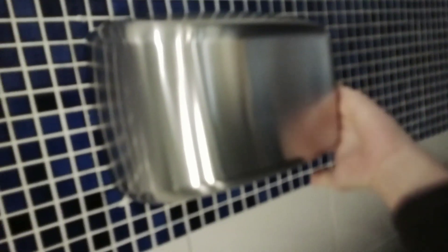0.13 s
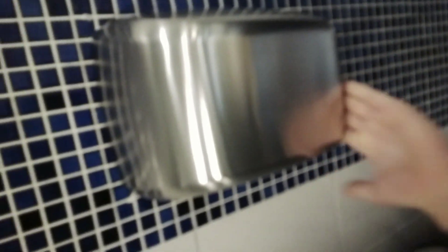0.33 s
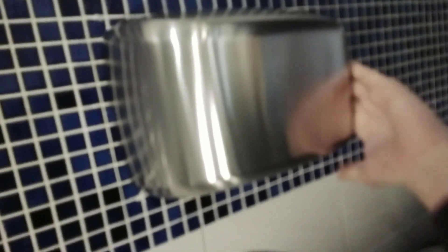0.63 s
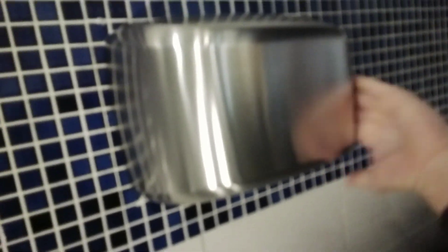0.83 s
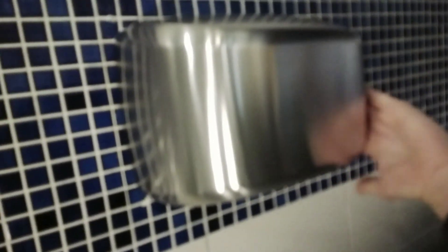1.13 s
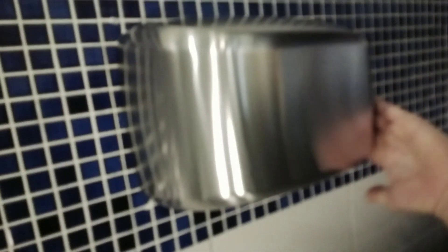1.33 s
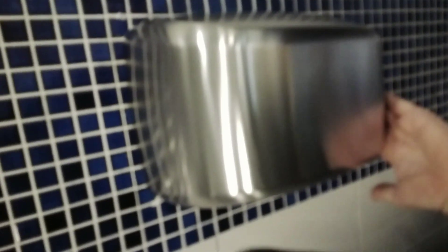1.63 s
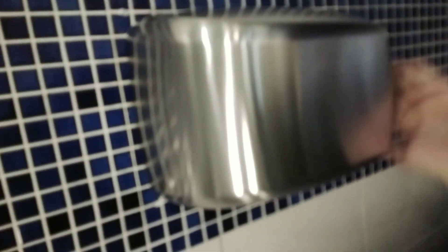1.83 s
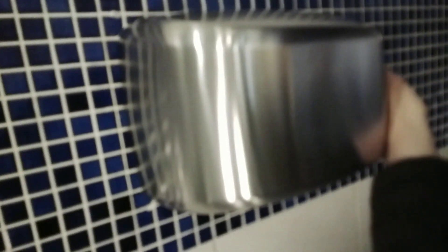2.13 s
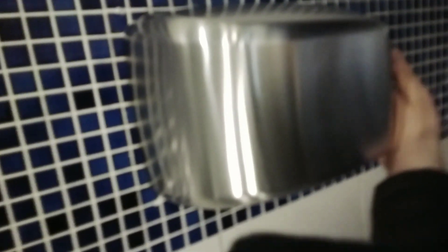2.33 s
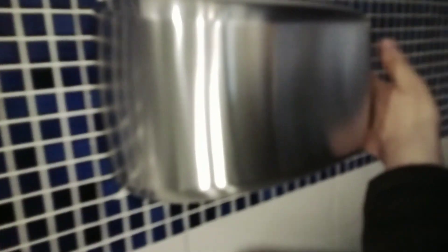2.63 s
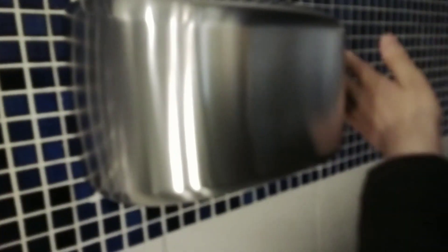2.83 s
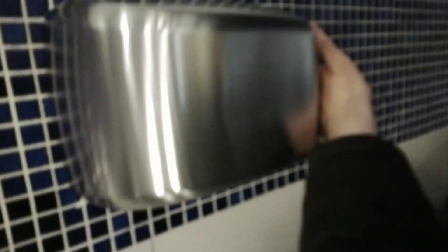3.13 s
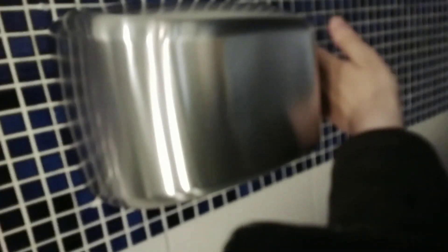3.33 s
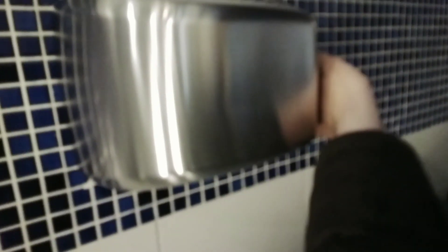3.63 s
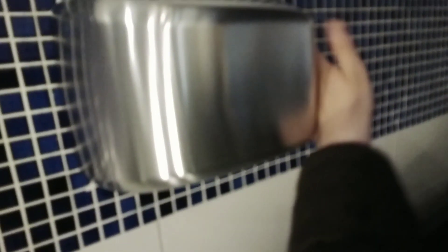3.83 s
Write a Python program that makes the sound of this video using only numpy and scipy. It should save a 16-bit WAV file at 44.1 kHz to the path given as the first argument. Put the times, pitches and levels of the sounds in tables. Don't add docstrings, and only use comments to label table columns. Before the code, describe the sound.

Close up in a tiled washroom, a hand dryer's soft airflow swells unevenly over a waving hand, dies away, then a small relay click starts a much louder broadband rush with a rising motor tone.

```python
import sys
import numpy as np
from scipy import signal
from scipy.fft import rfft, irfft
from scipy.io import wavfile
from scipy.ndimage import uniform_filter1d

SR = 44100
rng = np.random.default_rng(int(sys.argv[2]) if len(sys.argv) > 2 else 0)


def natural_amplitude(level_db):
    exponent = np.asarray(level_db, float) / 20
    return 10 ** exponent


def int16_out(signal):
    q = np.round(np.clip(np.atleast_2d(signal).T, -1, 1) * 32767)
    wavfile.write(sys.argv[1], SR, q.astype(np.int16))


N = 176400
T = np.arange(N) / SR

# frequency in Hz, spectrum level in dB per Hz.
FLOOR_SPECTRUM = [(30, -38), (138, 0), (420, -23.5), (740, -9), (2600, -23), (8300, -21.5), (16000, -50)]
# middle in seconds, lowest Hz, highest Hz, level in dB.
STEREO_FLECKS = [(.29, 8200, 9700, -49), (.29, 14500, 15700, -57), (.383, 5100, 6400, -59),
                 (.383, 8900, 10400, -58), (1.684, 6200, 8300, -48), (1.684, 8900, 10400, -52),
                 (2.36, 11000, 12500, -75), (2.427, 4200, 7000, -66), (2.475, 8900, 13100, -72),
                 (3.309, 6900, 8400, -37), (3.309, 12300, 13800, -45)]
# frequency in Hz, width in Hz, level in dB.
RELAY_MODES = [(800, 300, -17), (4500, 810, -23), (6480, 480, -2), (8000, 540, 5), (9300, 1200, 5),
               (12200, 900, 2), (14500, 2100, -5)]
# start in seconds, level in dB, pitch in Hz, ring T60 in seconds.
BUMPS = [(0.0011, -26.5, 248.7, 0.15), (0.64, -28, 237, 0.047), (0.67, -32.5, 284, 0.13),
         (0.841, -26, 211, 0.098), (.875, -29, 277, 0.12), (1.115, -35, 280, 0.056),
         (1.256, -26.5, 293, 0.12), (1.325, -24.5, 254, 0.051), (1.394, -29, 270, 0.053),
         (1.501, -31, 285, 0.21), (1.53, -36.5, 144, 0.29), (0.129, -43.5, 137, 0.48),
         (2.42, -49.5, 64, 0.36), (1.92, -40.5, 298, 0.54), (.02, -47, 57, .2), (1.525, -38, 205, .08),
         (.18, -40, 255, .1), (.008, -31, 205, .13), (1.56, -36, 312, 0.12), (.635, -47, 55, .1),
         (0.83, -48, 55, 0.16), (1.05, -48, 52, 0.1), (1.437, -49, 60, .08), (2.8654, -28, 285, 0.15),
         (3.05, -23.5, 270, 0.079), (3.28, -26.5, 269, .1), (3.61, -17, 285, 0.12), (3.831, -20, 285, 0.24)]
# start in seconds, length in seconds, level in dB, pitch in Hz.
WHISTLES = [(2.87, .15, -35, 2630), (2.76, .09, -36, 900), (3.0, .2, -37, 2700), (2.99, .11, -34, 295),
            (.96, .09, -50, 15550), (1.17, .09, -49, 15550), (1.57, .06, -54, 15550), (1.84, .15, -46, 700),
            (2.75, .09, -43, 2000), (2.77, .1, -45, 2620), (3.05, .13, -34, 1950), (2.91, .04, -36, 900),
            (1.5, .15, -45, 2050), (.5, .1, -45, 2050), (.27, .08, -44, 1900), (1.15, .06, -46, 2950),
            (.53, .07, -46, 5700), (.75, .07, -47, 5700), (1.38, .06, -52, 5800), (1.24, .08, -44, 680),
            (1.5, .07, -44, 700), (2.49, .07, -59, 1450), (1.85, .05, -46, 1000), (1.91, .08, -45, 620),
            (.8, .13, -46, 600), (2.72, .08, -50, 8300), (2.78, .08, -44, 60), (3.9, .1, -34, 690)]
# frequency in Hz, spectrum level in dB per Hz.
PALM_SPECTRUM = [(530, -35), (900, 3.5), (1120, -10.5), (2040, -4), (3330, -5), (4400, -9.5), (8410, -6),
                 (14400, -22), (15900, -28)]
# middle in seconds, length in seconds, level in dB, gap whistle in Hz, hiss in dB.
SWEEPS = [(0.211, 0.077, -45, 3100, 6.5), (0.311, 0.085, -35, 1750, -4.5), (0.266, 0.086, -36, 3350, -3),
          (0.56, .14, -39, 1930, 1.2), (0.791, .13, -39.5, 1930, 0.7), (0.99, 0.12, -37.5, 1940, -1),
          (1.211, 0.11, -37, 2200, 1), (1.398, 0.087, -38, 1700, -0.5), (1.588, 0.12, -36, 3430, 0),
          (1.568, 0.026, -32, 3700, -0.5), (1.6, 0.057, -36, 1940, -3), (.765, 0.047, -36, 2030, -1),
          (.24, .05, -42.5, 3700, -3), (0.332, 0.05, -40, 3050, -4), (0.578, 0.091, -44, 3300, -5),
          (0.619, 0.044, -40, 1450, -4), (.83, .05, -42, 2400, -8), (1.04, 0.022, -37, 1500, -9),
          (1.02, .03, -41, 2600, -7), (1.18, .06, -41.5, 2500, -4), (1.255, .025, -34.5, 1800, -5),
          (1.427, 0.017, -36.5, 1400, -2), (3.07, 0.23, -36.5, 8300, 1), (3.9, 0.16, -37, 6400, 2.5),
          (1.703, 0.19, -42, 2740, -0.5), (2.48, 0.17, -54, 1650, -26), (1.934, 0.2, -47, 1700, 1.7),
          (2.798, 0.05, -35, 1700, -16), (3.09, 0.21, -30, 1840, 0.5), (3.426, 0.15, -31, 1500, 3),
          (3.648, 0.084, -25, 830, -2.5)]
# frequency in Hz, width in Hz.
NOZZLE_MODES = [(1500, 300), (2050, 92), (3210, 110), (5840, 130)]
# frequency in Hz, width in Hz, level over the jet in dB.
DUCT_MODES = [(137, 27, -16.5), (246.6, 17, -14), (285, 38, -11), (656, 85, -12), (554.8, 22, -19.5),
              (997.4, 18, -19.5), (1066, 14, -24.5), (1389, 30, -22), (1594, 58, -19.5), (1876, 42, -20.5),
              (2042, 65, -18.5), (2990, 810, -14), (3305, 61, -24.5), (7900, 2800, -10.5)]
# time in seconds, level in dB, treble tilt in dB.
RUNDOWN = [
    (0.0, -40, -1),
    (.43, -42.5, 3),
    (.68, -41.5, -2),
    (1.1, -40, 0.5),
    (1.47, -38.5, 1),
    (1.79, -39.5, 1.5),
    (2.13, -45.5, -0.5),
    (2.5, -58.5, 3.5),
    (2.7, -72, 1),
]
# time in seconds, level in dB, treble tilt in dB.
RESTART = [
    (2.74, -37.5, -4),
    (2.8, -27.5, -10.5),
    (2.84, -34, 0.5),
    (2.99, -24.5, 3),
    (3.15, -26.5, 5.5),
    (3.22, -24, -1.3),
    (3.6, -23, 0.5),
    (3.7, -21.5, .5),
    (4.0, -22, 0.3),
]
# frequency in Hz, spectrum level in dB per Hz.
WEAK_JET_SPECTRUM = [(18, -58), (30, -28), (90, -16), (280, -3.5), (394, -8.5), (632, -5), (3770, -19),
                     (8300, -15), (16000, -33)]
# time in seconds, level in dB.
HUM = [
    (2.7, -54),
    (2.746, -29),
    (2.86, -40.5),
    (2.95, -34.5),
    (4.0, -40),
]
# time in seconds, frequency in Hz, level in dB.
ROTOR = [
    (3.3, 132, -47),
    (3.59, 134.3, -53),
    (3.635, 137.7, -28),
    (3.76, 137.6, -23),
    (4.0, 143.3, -19),
]
# frequency in Hz, spectrum level in dB per Hz.
FULL_JET_SPECTRUM = [(30, -55), (90, -3.5), (280, 0.8), (700, -1.5), (2000, -9.5), (4400, -13.5),
                     (8300, -8), (16000, -26.5)]
# frequency in Hz, width in octaves, depth in dB, full at seconds.
LATE_BANDS = [(350, .8, -14, 2.87), (4600, .1, -11, 2.955), (6200, .3, -12, 2.79), (12500, .4, -9, 2.81),
              (1500, .5, -5, 2.95)]

RELAY_S = 2.7


def evened(x):
    return x / np.sqrt(np.mean(x ** 2) + 1e-20)


def read(points, hz):
    f, value = np.transpose(points)
    return np.interp(np.log(hz + 1), np.log(f + 1), value)


def resonate(x, hz, width):
    turn = np.exp(2j * np.pi * hz * np.arange(len(x)) / SR)
    r = np.exp(-np.pi * width / SR)
    return 2 * (turn * signal.lfilter([1 - r], [1, -r], x * turn.conj())).real


def resonate_twice(x, hz, width):
    return resonate(resonate(x, hz, width), hz, width)


def air(spectrum, field, patch_db):
    frames = N // 128 + 5
    hz = np.fft.rfftfreq(512, 1 / SR)[:, None]
    a, b, patches = rng.standard_normal((frames, 257, 3)).T
    patches = uniform_filter1d(patches, size=6, axis=0)
    patches = evened(uniform_filter1d(patches, size=24, axis=1))
    flicker_db = 0.9 * evened(uniform_filter1d(rng.standard_normal(frames), size=8))
    z = (a + 1j * b) * natural_amplitude(read(spectrum, hz)) * natural_amplitude(patch_db * patches + flicker_db)
    scale = np.std(signal.istft(z, nperseg=512, noverlap=384)[1])
    shaped = z * field(hz, np.arange(frames) * 128 / SR)
    return signal.istft(shaped, nperseg=512, noverlap=384)[1][:N] / scale


def flow(table, hz, t):
    s, db, tilt_db = np.transpose(table)
    tilt = np.clip(np.log2((hz + 1) / 1500) / 3, -1, 1)
    return natural_amplitude(np.interp(t, s, db) + np.interp(t, s, tilt_db) * tilt)


def still_air():
    return natural_amplitude(-56) * air(FLOOR_SPECTRUM, lambda hz, t: 1, patch_db=0.8)


def stereo_flecks():
    hz = np.fft.rfftfreq(N, 1 / SR)
    out = np.zeros(N)
    noise = rfft(rng.standard_normal(N))
    for s, low_hz, high_hz, db in STEREO_FLECKS:
        band = evened(irfft(noise * (hz > low_hz) * (hz < high_hz), N))
        out += natural_amplitude(db) * band * np.cos(np.pi * np.clip((T - s) / .038, -.5, .5))
    return np.array([out, -out])


def room(x):
    room_db, t60 = -12, 0.48
    t = np.arange(SR // 2) / SR
    tail = rng.standard_normal(len(t)) * natural_amplitude(-60 * t / t60) * (t > .008)
    return x + natural_amplitude(room_db) * signal.fftconvolve(x, tail / np.linalg.norm(tail))[:N]


def relay():
    level_db, t60, rebound_s = -36.5, 0.11, 0.013
    noise = rng.standard_normal(N)
    colour = evened(sum(natural_amplitude(db) * evened(resonate_twice(noise, hz, w)) for hz, w, db in RELAY_MODES))
    decay = np.zeros(N)
    for s, db in [(RELAY_S, level_db), (RELAY_S + rebound_s, level_db - 14)]:
        decay += (T > s) * natural_amplitude(db - 60 * abs(T - s) / t60)
    return colour * decay


def bumps():
    rise_s, hold = 0.0081, .18
    shudder = 1 + .25 * evened(resonate_twice(rng.standard_normal(N), 0, 60))
    out = np.zeros(N)
    for s, db, hz, t60 in BUMPS:
        part = out[round(s * SR):][:SR // 2]
        t = T[:len(part)]
        ring = np.sin(2 * np.pi * hz * t)
        ring += 0.31 * np.sin(2 * np.pi * hz * 1.1 * t)
        ring += 0.39 * np.sin(2 * np.pi * hz * .8 * t)
        decay = natural_amplitude(db - 60 * np.maximum(t / t60 - hold, 0)) * (1 - 2 * t) ** .5
        part += np.minimum(t / rise_s, 1) * decay * ring
    return out * shudder


def gap_whistles():
    out = np.zeros(N)
    t = np.arange(SR // 4) / SR
    for s, length, db, hz in WHISTLES:
        width = 1.9 * np.sqrt(hz)
        tone = evened(resonate_twice(rng.standard_normal(len(t)), hz, width))
        swell = np.exp(-abs(2 * t / length - 1) ** 3) * np.minimum(t / 0.0032, 1)
        part = out[round(s * SR):][:len(t)]
        part += (natural_amplitude(db) * swell * tone)[:len(part)]
    return out


def spool():
    from_hz, hz_per_s, length_s, level_db = 520, 4800, .09, -40
    t = np.maximum(T - RELAY_S, 0)
    fuzz = evened(resonate(rng.standard_normal(N), 0, 150))
    glide = np.sin(2 * np.pi * (from_hz * t + hz_per_s * t ** 2 / 2))
    swell = np.sin(np.pi * np.minimum(t / length_s, 1))
    return natural_amplitude(level_db) * (1 + .5 * fuzz) * glide * swell


def hand():
    whistle_db, whistle_width, flutter_db = 8, 0.26, 2

    def field(hz, t):
        power = 0
        for mid, length, db, gap_hz, hiss_db in SWEEPS:
            arch = np.exp(-abs(2 * (t - mid) / length) ** 3)
            peak = natural_amplitude(whistle_db) * np.exp(-(np.log((hz + 1) / gap_hz) / whistle_width) ** 2)
            hiss = natural_amplitude(hiss_db * np.clip(np.log2((hz + 1) / 2500), 0, 1.5))
            hiss = hiss * np.clip((hz - 500) / 700, 0, 1)
            power = power + (natural_amplitude(db) * arch) ** 2 * (hiss ** 2 + peak ** 2)
        return np.sqrt(power)

    flutter = evened(resonate_twice(rng.standard_normal(N), 0, 37))
    hiss = air(PALM_SPECTRUM, field, patch_db=1.5) * natural_amplitude(flutter_db * flutter)
    return hiss + sum(0.77 * resonate_twice(hiss, hz, w) for hz, w in NOZZLE_MODES)


def duct():
    before = flow(RUNDOWN, 1200, T) * (T < RELAY_S)
    after = flow(RESTART, 1400, T) * np.clip((T - RELAY_S - .08) / 0.067, 0, 1)
    noise = rng.standard_normal(N)
    ringing = sum(natural_amplitude(db) * evened(resonate_twice(noise, hz, w)) for hz, w, db in DUCT_MODES)
    return (before + after) * ringing


def weak_jet():
    def field(hz, t):
        return flow(RUNDOWN, hz, t) * np.clip((2.8 - t) / 0.12, 0, 1)
    return air(WEAK_JET_SPECTRUM, field, patch_db=2.03)


def motor():
    hum_hz, idle_db, coast_s, coast_hz_per_s, second_db = 100.5, -56.5, 2.08, 95, -13.5
    wobble = evened(resonate(rng.standard_normal(N), 0, 14))
    idle = natural_amplitude(idle_db + 2.2 * wobble) * np.clip((2.45 - T) / .4, 0, 1)
    driven = natural_amplitude(np.interp(T, *np.transpose(HUM))) * np.clip((T - RELAY_S) / .02, 0, 1)
    pitch = hum_hz - coast_hz_per_s * np.maximum(T - coast_s, 0) * (T < 2.6)
    hum = (idle + driven) * np.sin(2 * np.pi * np.cumsum(pitch) / SR)
    s, hz, db = np.transpose(ROTOR)
    phase = 2 * np.pi * np.cumsum(np.interp(T, s, hz)) / SR
    level = natural_amplitude(np.interp(T, s, db) + .7 * wobble) * np.clip((T - s[0]) / .1, 0, 1)
    rotor = level * (np.sin(phase) + natural_amplitude(second_db) * np.cos(2 * phase))
    return np.sqrt(2) * (hum + rotor)


def full_jet():
    start_hz, hz_per_s, slope_db, fill_s = 700, 42000, -14, .02

    def field(hz, t):
        corner_hz = start_hz + hz_per_s * np.maximum(t - RELAY_S - .02, 0)
        shut_db = slope_db * np.clip(np.log2((hz + 1) / corner_hz), 0, 1) * (hz < 5400)
        for late_hz, octaves, db, full_s in LATE_BANDS:
            band = np.exp(-(np.log2((hz + 1) / late_hz) / octaves) ** 4)
            shut_db = shut_db + db * band * np.clip((full_s - t) / fill_s, 0, 1)
        onset = np.clip((t - RELAY_S - .008) / 0.024, 0, 1)
        return flow(RESTART, hz, t) * natural_amplitude(shut_db) * onset

    return air(FULL_JET_SPECTRUM, field, patch_db=1.0)


def scene():
    near = room(hand() + gap_whistles() + spool() + bumps() + relay())
    mix = still_air() + near + duct() + weak_jet() + motor() + full_jet()
    return np.array([mix, mix])


def band_limit(x):
    return signal.sosfilt(signal.butter(12, 16320, fs=SR, output="sos"), x)


def record(dry):
    low_cut = signal.butter(3, 48, "high", fs=SR, output="sos")
    heard = signal.sosfilt(low_cut, dry)
    heard = signal.oaconvolve(heard, signal.firwin(511, 15820, fs=SR)[None], "same")
    return band_limit(heard + stereo_flecks())


dry = scene()
out = record(dry)
int16_out(out)
```